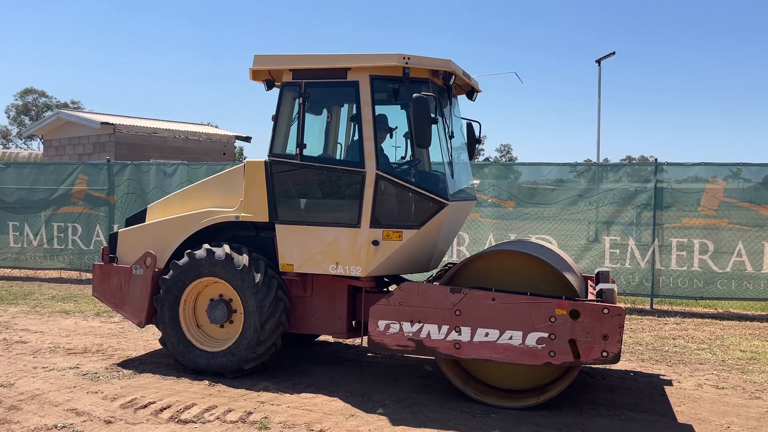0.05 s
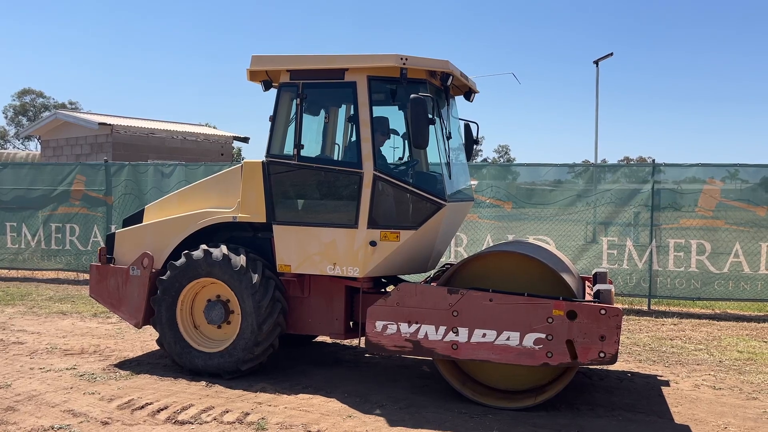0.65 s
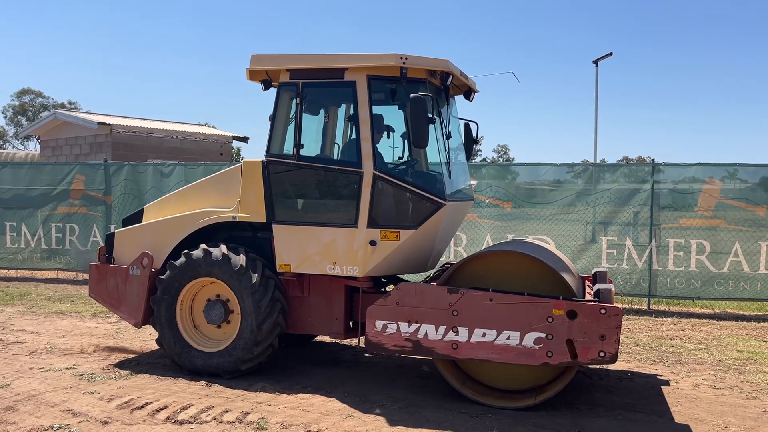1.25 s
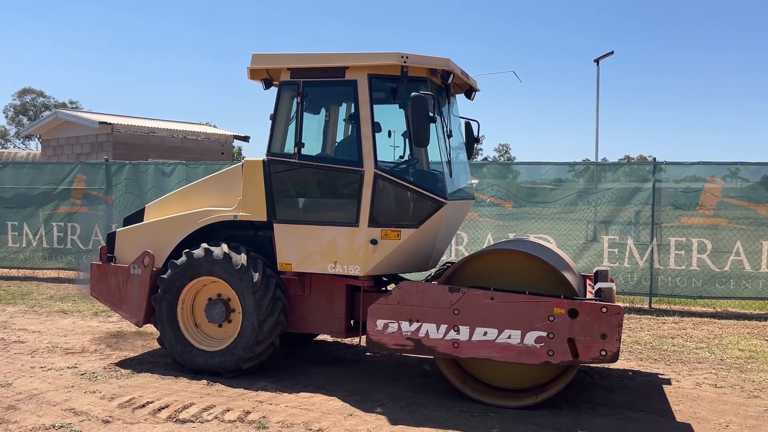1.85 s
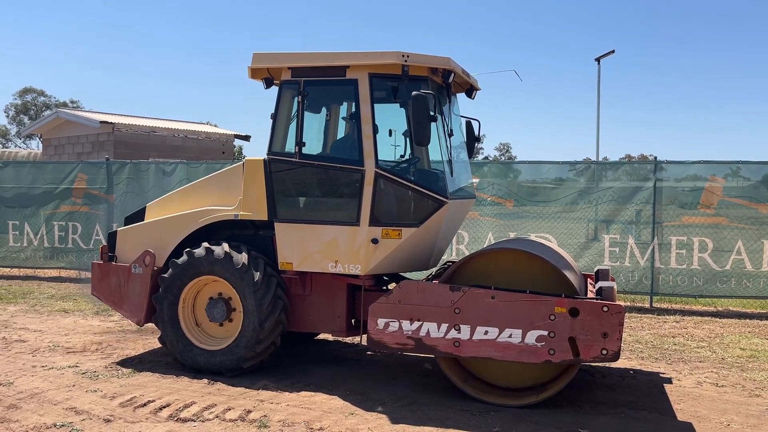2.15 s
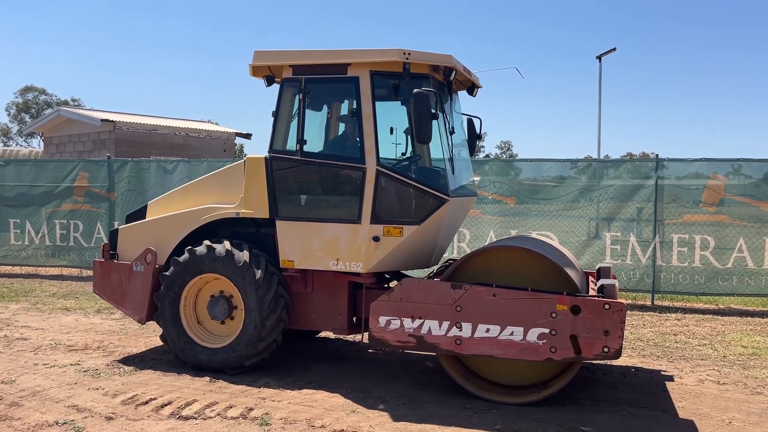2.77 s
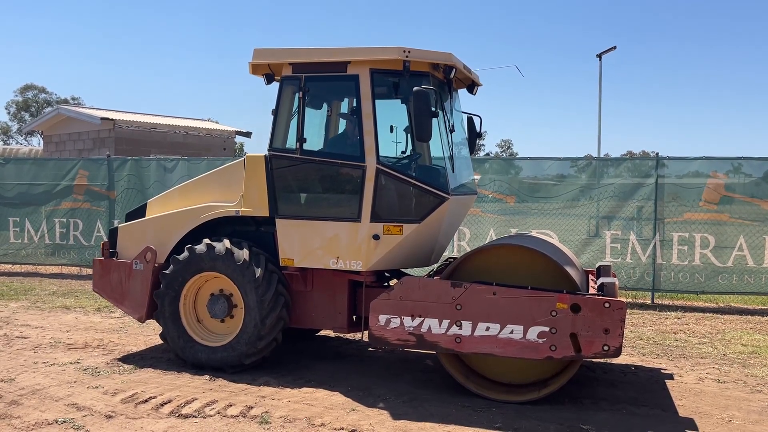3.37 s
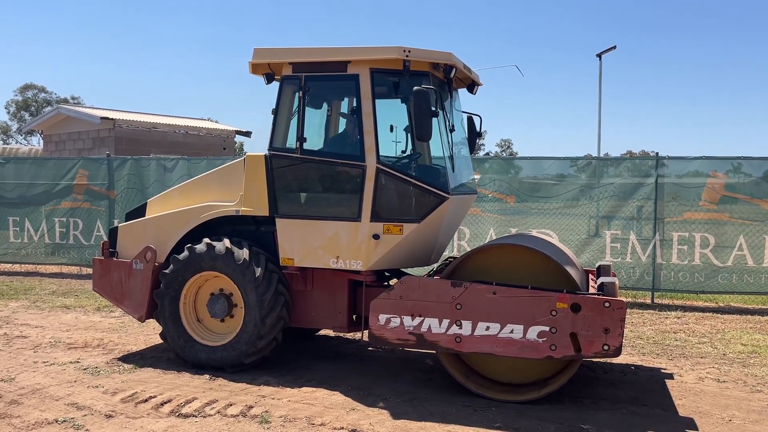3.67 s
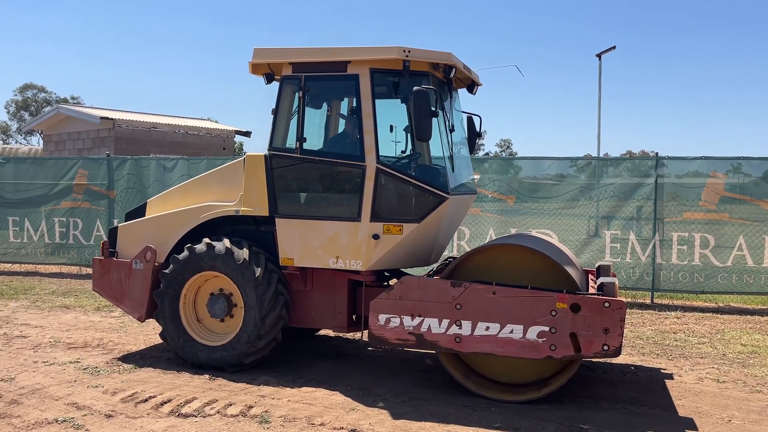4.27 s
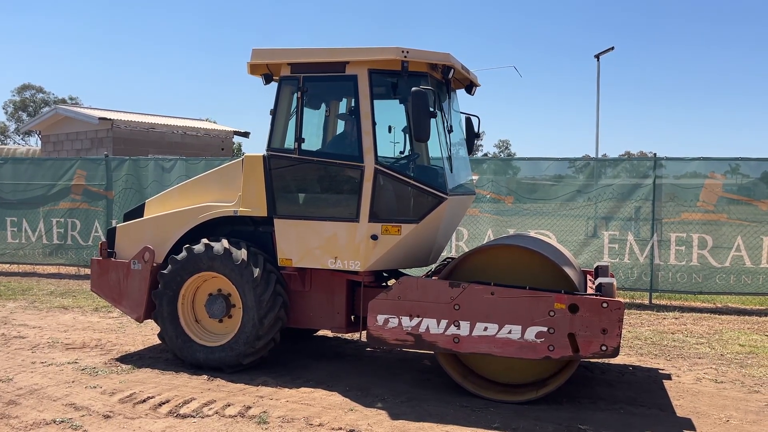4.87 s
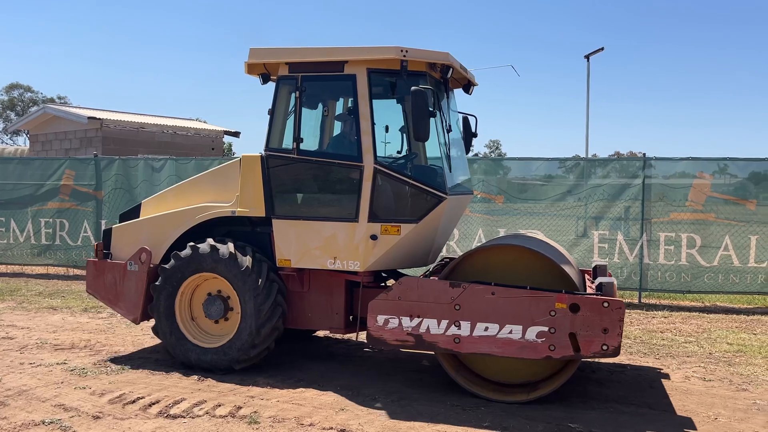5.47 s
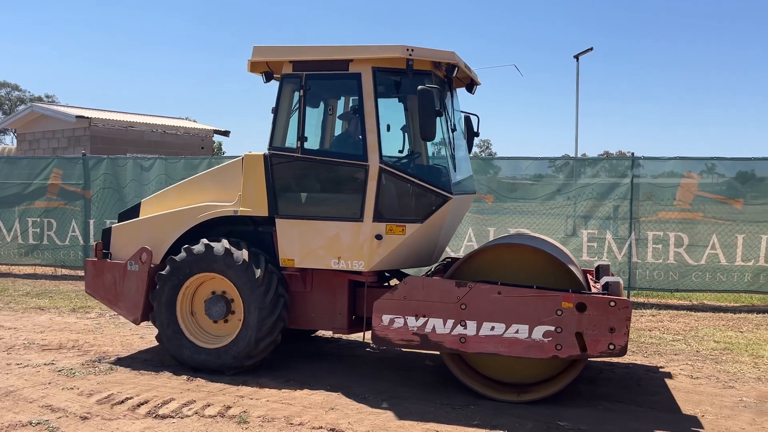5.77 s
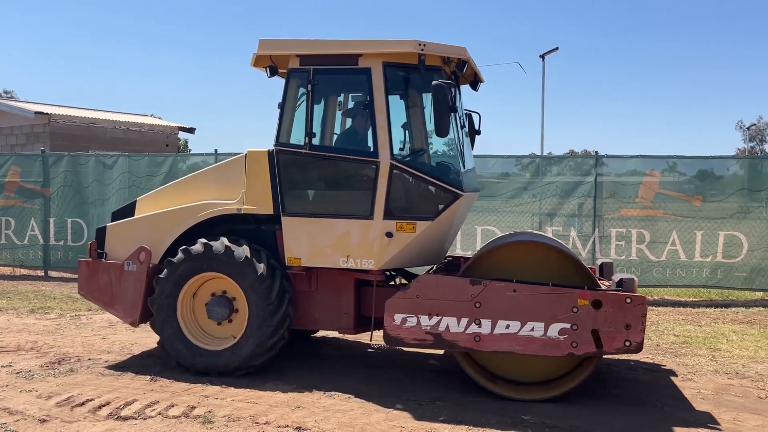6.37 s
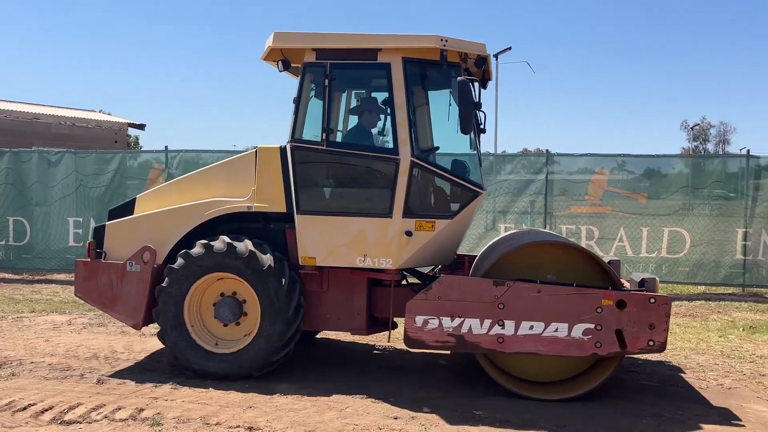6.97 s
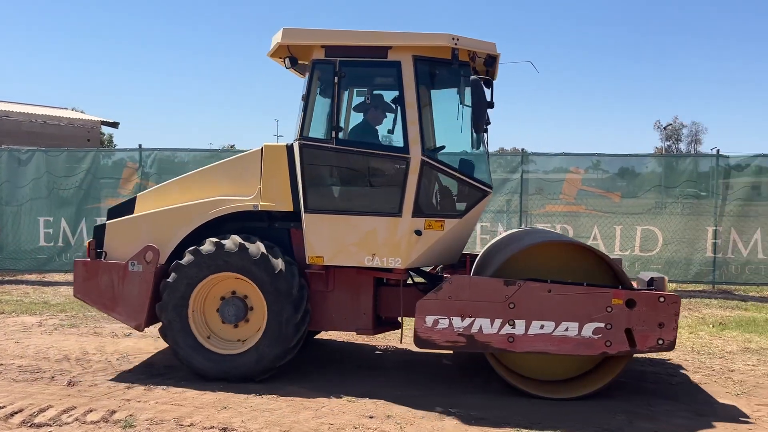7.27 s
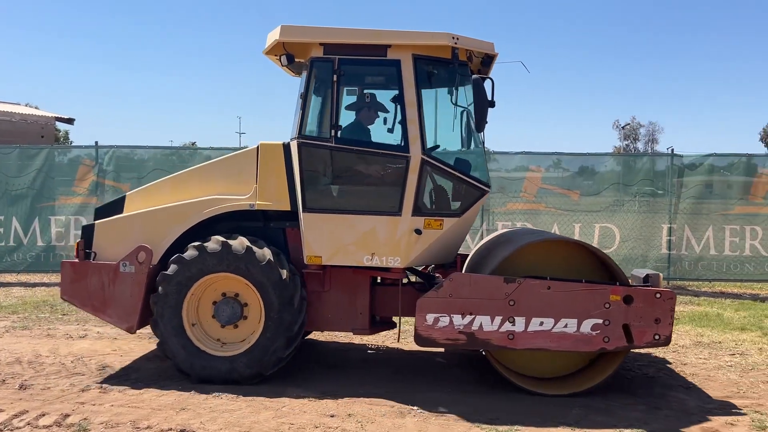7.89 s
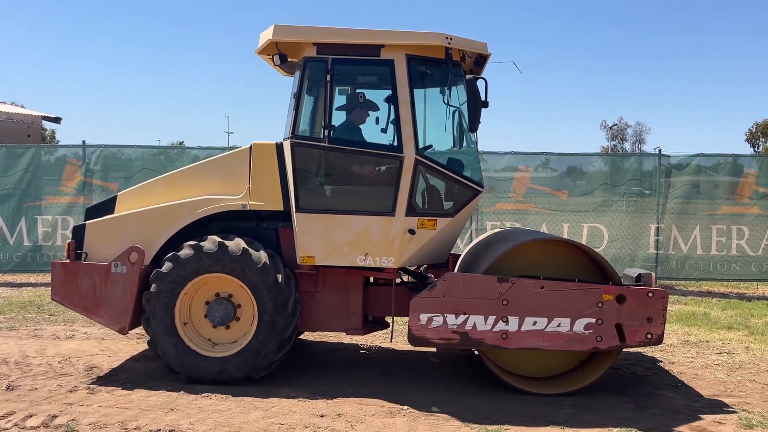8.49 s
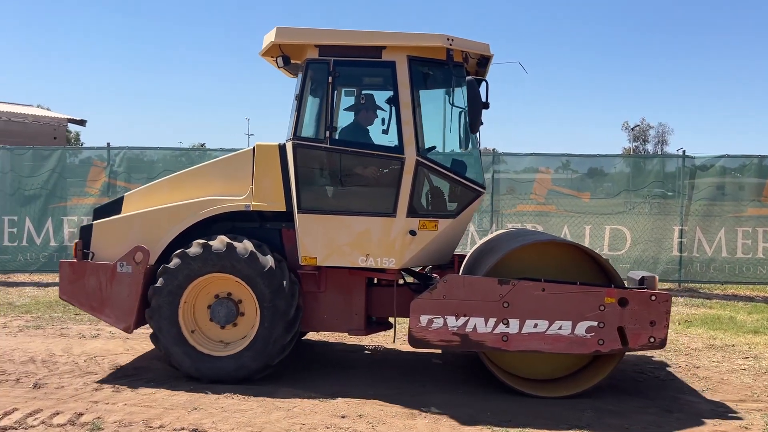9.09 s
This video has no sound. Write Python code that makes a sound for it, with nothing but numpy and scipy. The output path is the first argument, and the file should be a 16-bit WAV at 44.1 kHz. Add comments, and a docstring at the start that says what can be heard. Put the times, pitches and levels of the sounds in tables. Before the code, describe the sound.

At about 0.2 seconds a road roller's starter engages with a metallic clank, then whines, grinds and chugs for half a second. Around 0.7 seconds the diesel engine catches with deep kicks and hard knocks, surging near 1 second as the starter spins down. By 1.3 seconds it settles into a steady idle: a low exhaust drone with rapid metallic clatter, bright ticking and a hum of gears and fan. Gusts thump on the nearby stereo microphones, mostly from 2 to 3.4 seconds and again around 5. A light hydraulic whine rises from about 5 seconds, peaks before 7 and then recedes. Two soft footsteps scuff the dirt at about 6.3 and 7.1 seconds as the listener moves sideways. The idle then sounds slightly louder and boomier, with more fan hum, and continues until the end, just past 9 seconds. The place is an open dirt lot.

```python
"""Road roller starting up

Open dirt lot, spaced stereo microphones near the machine. The starter clanks in and cranks; the
four-cylinder diesel catches and settles to idle. Exhaust puffs drone, blows ring the block, the gears
and fan hum, a hydraulic pump whines. Gusts buffet the microphones, and about six seconds in the
listener takes a few steps sideways over the dirt."""
import sys
import numpy as np
from scipy import signal
from scipy.fft import rfft, irfft, next_fast_len
from scipy.io import wavfile
from scipy.ndimage import uniform_filter1d

SR = 44100
rng = np.random.default_rng(int(sys.argv[2]) if len(sys.argv) > 2 else 0)


def inscribe(sig):
    """Save sig as 16-bit PCM at rate SR to the path in sys.argv[1].

    A 1-D sig is mono; a 2-D sig holds one channel per row.
    Samples are clipped to [-1, 1] before scaling.
    """
    pcm = np.round(np.clip(np.atleast_2d(sig).T, -1, 1) * 32767)
    wavfile.write(sys.argv[1], SR, pcm.astype(np.int16))


N = 407484
T = np.arange(N) / SR
MESH_S, FIRST_FIRINGS_S, SURGE_S = .25, (.6, .76), .95  # pinion in, engine fires, fuel peaks
WALK_S, ARRIVE_S = (5.82, 6.8), (7.0, 7.2)  # the listener moves sideways, then comes to rest


def from_db(db):
    """Decibels to gain."""
    return np.exp(np.asarray(db) * (np.log(10) / 20))


def rms_one(x):
    """Scale to unit power."""
    return x / np.sqrt(np.mean(x ** 2) + 1e-20)


def in_time(points):
    """Read a curve at every sample."""
    return np.interp(T, *np.transpose(points))


def at_hz(points, hz):
    """Read a spectrum on a log-frequency axis."""
    f, value = np.transpose(points)
    return np.interp(np.log(np.maximum(hz, 1)), np.log(f), value)


def drift(rate):
    """A random curve of rms 1 that turns about rate times a second."""
    knots = rng.standard_normal(4096)
    return rms_one(np.interp(T * rate, np.arange(len(knots)), knots))


def ramp(start, end):
    """Rises from 0 to 1 between two moments."""
    return np.clip((T - start) / (end - start), 0, 1)


def bell(centre_s, width_s):
    """A Gaussian rise to 1 and back."""
    return np.exp(-((T - centre_s) / width_s) ** 2)


def strikes(rows, attack_s, decay_s):
    """A quick rise and a dying tail for each row of t/s, level/dB."""
    return sum(from_db(db) * ramp(s, s + attack_s) * np.exp(-np.maximum(T - s, 0) / decay_s)
               for s, db in rows)


def swells(rows):
    """A smooth rise and fall for each row of t/s, level/dB, length/s."""
    return sum(from_db(db) / (1 + ((T - s) / length) ** 2) ** 2 for s, db, length in rows)


def tone(turns, flutter_db, flutter_hz):
    """A sine of rms near 1 whose strength flutters."""
    return np.sqrt(2) * np.cos(2 * np.pi * turns) * from_db(flutter_db * drift(flutter_hz))


def white():
    """Two independent white noises."""
    return rng.standard_normal((2, N))


# Diffuse sound against direct at the microphones: f/Hz, level/dB
DIFFUSE_SHARE = [(60, -19), (150, -14), (300, -14), (800, -8), (2000, -12.5), (4000, -5), (8000, -18),
                 (15000, -36)]
# Left microphone against right: f/Hz, level/dB
BALANCE = [(60, 0), (110, 2), (200, -3.5), (380, 1.5), (700, -0.5), (1290, 4.5), (2380, -0.5), (4400, 4.5),
           (8120, -1.5), (15000, -1.5)]
# Lead of the left microphone: f/Hz, phase/rad
PHASE_LEAD = [(200, 0), (860, .4), (1810, -.1), (3270, 1.1), (4910, .4), (5510, -.6), (6550, -3.1),
              (7400, -5.6), (10200, -6.7), (12200, -9.4), (14000, -9.8), (14800, -12.4)]
def colour(pair, spectrum):
    """A direct and a diffuse signal, filtered and picked up by the spaced microphones; rms 1."""
    size = next_fast_len(N + 8192, real=True)
    hz = np.arange(size // 2 + 1) * SR / size
    direct, diffuse = rfft(pair, size) * from_db(at_hz(spectrum, hz)) * (hz > 15)
    diffuse = diffuse * from_db(at_hz(DIFFUSE_SHARE, hz))
    leftward = from_db(at_hz(BALANCE, hz) / 2) * np.exp(.5j * at_hz(PHASE_LEAD, hz))
    left, right = (direct + diffuse) * leftward, (direct - diffuse) / leftward
    return rms_one(irfft(np.array([left, right]), size)[:, :N])


def noise(spectrum):
    """Steady coloured stereo noise."""
    return colour(white(), spectrum)


def rough_noise(spectrum, flutter_db, flutter_hz):
    """Coloured stereo noise made grainy by a fast flutter."""
    return colour(white() * from_db(flutter_db * drift(flutter_hz)), spectrum)


# Background of the open lot: f/Hz, relative level/dB
AIR = [(18, -46), (30, -18), (64, 1), (138, -9), (239, -14.5), (359, -21), (513, -26), (552, -30.5),
       (2790, -45), (9000, -63), (11700, -94), (19800, -120)]
def open_air():
    """A faint, steady rumble lies over the lot."""
    return from_db(-38) * noise(AIR)


# Solenoid pulling in, pinion striking, pinion slamming home: t/s, level/dB
CLANKS = [(.208, -40), (.223, -30), (.236, -21.5)]
# Pinion on the ring gear: f/Hz, relative level/dB
PINION = [(120, -24), (200, -5), (400, -16), (500, 1), (600, -11), (780, -0.5), (1000, -10), (1330, -13),
          (1600, -7), (2100, -4.5), (2700, -16), (5000, -22), (8100, -28.5), (12700, -35), (15000, -37)]
# Ring of the flywheel housing: f/Hz, relative level/dB
HOUSING = [(120, -14), (220, 0), (400, -10), (520, 0), (780, 0), (1050, -8), (2100, -10), (3000, -26),
           (8000, -50)]
def starter_clank():
    """The solenoid throws the pinion into the ring gear, and the flywheel housing rings on."""
    impact = strikes(CLANKS, attack_s=.009, decay_s=.021) * rough_noise(PINION, .43, 650)
    housing = strikes(CLANKS, attack_s=.009, decay_s=.055) * noise(HOUSING)
    return impact + from_db(-10) * housing


# Commutator rate, held back by each compression, then coasting: t/s, f/Hz
COMMUTATOR = [(.2, 40), (.29, 91), (.345, 112), (.405, 115), (.44, 133), (.48, 145), (.535, 143),
              (.59, 164), (.64, 168), (.68, 186), (.77, 199), (.85, 181), (.97, 164), (1.3, 110)]
# Compressions that load the starter: t/s, level/dB
COMPRESSIONS = [(.399, -36), (.512, -30.5), (.534, -41), (.636, -39), (.699, -33), (.72, -36), (.741, -32),
                (.765, -35)]
# Chug of one compression: f/Hz, relative level/dB
CHUG = [(60, -12), (120, -4), (280, 6), (400, -6), (550, -3), (830, 3), (1400, -7), (2100, -4.5),
        (3100, -11), (4400, -14), (6000, -25), (11000, -27), (15000, -38)]
# Grinding of the starter gears: f/Hz, relative level/dB
GRIND = [(60, -25), (100, -2), (280, 2), (380, -9), (520, 0), (830, -1.5), (1400, -10), (2200, -10.5),
         (2750, -12), (3100, -4.5), (3400, -12.5), (4350, -16.5), (5800, -24.5), (11000, -28.5),
         (15000, -35)]
# Whine of their teeth: multiple of the commutator rate, relative level/dB
WHINE_ORDERS = [(22, 0), (31, -9)]
def starter():
    """The motor whines, grinds and chugs through the compressions, then is overrun and spins down."""
    release_s, rise_db_per_s, coast_db_per_s = .86, 24.5, 50
    turns = np.cumsum(in_time(COMMUTATOR)) / SR
    chugs = strikes(COMPRESSIONS, attack_s=.006, decay_s=.033) * rough_noise(CHUG, 2, 300)
    roughness_db = 1.1 * np.cos(2 * np.pi * turns) + 1.6 * drift(300)
    grind = colour(white() * from_db(roughness_db), GRIND)
    grind *= from_db(-46 + rise_db_per_s * (np.minimum(T, release_s) - MESH_S))
    whine = sum(from_db(db) * tone(k * turns + .22 * drift(300), 3, 90) for k, db in WHINE_ORDERS)
    whine *= from_db(-49.3) * (1 - .7 * ramp(.44, .56))  # sinks into the grinding
    hum_db = -47.5 + 15.5 * ramp(*FIRST_FIRINGS_S) - coast_db_per_s * np.maximum(T - release_s, 0)
    hum = from_db(hum_db) * tone(turns, flutter_db=1.5, flutter_hz=30)
    meshed = ramp(MESH_S, MESH_S + .03)
    driving = 1 - ramp(FIRST_FIRINGS_S[1], SURGE_S)
    return chugs + meshed * (hum + driving * (grind + whine))


# Governed firing rate, sagging under pump load: t/s, f/Hz
IDLE = [(1.7, 49.1), (4.2, 49.25), (5.3, 49.2), (5.9, 48.8), (6.4, 48.15), (6.85, 47.9), (7.1, 49.0),
        (7.4, 49.65), (7.8, 49.6), (8.3, 49.2), (9.24, 48.7)]
def firing_rate():
    """Firings per second: cranked slowly, then running up an S-curve to the governed speed."""
    cranking_hz, catch_s, run_up_s = 7, .85, .1
    caught = .5 + .5 * np.tanh((T - catch_s) / (2 * run_up_s))
    rate = cranking_hz * ramp(.18, MESH_S) * (1 - caught) + in_time(IDLE) * caught
    return rate * (1 + .0012 * drift(9))


def octaves(rate):
    """Doublings of speed relative to idle."""
    return np.log2(np.maximum(rate, 1) / np.median(rate))


def fuel_surge():
    """The governor's extra fuel during the run-up, 0 to 1."""
    return bell(SURGE_S, width_s=.12)


def cylinder_db(firings):
    """The four cylinders are not equally strong, so the engine chugs once per cycle."""
    return np.interp(firings % 4, np.arange(4), (-1, -.4, .4, 1), period=4)


# Exhaust orders: multiple of the firing rate, relative level/dB
EXHAUST_ORDERS = [(1, -0.5), (2, -4), (2.5, -19.5), (3, -10.5), (3.5, -15.5), (4, -17), (4.5, -15),
                  (5, -17.5)]
# Response of the silencer: f/Hz, gain/dB
SILENCER = [(15, -50), (28, -91), (42, -5.5), (52, 0), (72, -0.5), (98, -7), (150, -10.5), (260, -12.5)]
def exhaust(firings, rate):
    """One puff per firing, stronger with more fuel; the silencer favours the order in its boom."""
    arrived = ramp(*ARRIVE_S)
    boom_db = 1 + 2.5 * arrived  # the second order booms more where the listener stops
    timing = firings + .005 * drift(25)
    puffs = 0
    for order, db in EXHAUST_ORDERS:
        gain = from_db(db + at_hz(SILENCER, order * rate) + (order == 2) * boom_db)
        phase = (order > 2) * rng.random()
        puffs -= gain * tone(order * timing + phase, flutter_db=.5, flutter_hz=14)
    waver_db = (.9 * drift(7) + .5 * drift(49)) * (1 - .5 * arrived)
    level_db = -19.4 + 9.5 * fuel_surge() + 2.5 * arrived + waver_db + .4 * cylinder_db(firings)
    return from_db(level_db) * ramp(*FIRST_FIRINGS_S) * puffs


# Combustion, piston slap, valves, injection, gear teeth:
# blows per engine cycle, offset/cycles, relative level/dB, decay/s, unevenness/dB
CONTACTS = [(4, .006, -1.5, .008, 1), (2, .1, -4, .008, 1), (10, .02, -2, .004, 2.5),
            (13, .02, -6, .005, 2), (23, .01, -6, .0036, 0)]
def blows(firings, rate):
    """Metal contacts recur every four firings; their ring partly repeats, partly is new each blow."""
    size, harmonics, idle_hz = 16384, 1300, IDLE[0][1]
    cycle, cycle_s = np.arange(size) / size, 4 / idle_hz
    power = 0
    for count, offset, db, decay_s, uneven_db in CONTACTS:
        for k, extra_db in enumerate(uneven_db * rng.permutation(np.linspace(-1, 1, count))):
            age_s = (cycle - offset - k / count) % 1 * cycle_s
            power += (from_db(db + extra_db) * np.exp(-age_s / decay_s)) ** 2
    position = (firings / 4 % 1 * size).astype(int)
    phases = np.exp(2j * np.pi * rng.random((2, 2, harmonics)))
    before, after = rms_one(irfft(phases, size))[..., position]
    walked = ramp(*WALK_S)  # the paths to the microphones change during the walk
    repeating = np.cos(walked * np.pi / 2) * before + np.sin(walked * np.pi / 2) * after
    ring = repeating + .8 * white()
    sharpness = np.minimum(rate / idle_hz, 1) * (1 - .2 * walked)
    envelope = rms_one(np.sqrt(power))[position] ** sharpness
    return rms_one(ring * envelope * from_db(cylinder_db(firings) + .8 * drift(120)))


# Resonances of covers and panels: f/Hz, bandwidth/Hz, gain/dB
PANELS = [(1860, 11, -10), (2280, 100, -10), (2690, 130, -7), (2754, 100, -3.5), (3020, 75, 2),
          (3580, 126, 0), (4340, 110, -6.5), (4860, 40, 2), (5110, 53, 1)]
# Echoes off the ground, the drum frame and the fence: delay/s, gain/dB
ECHOES = [(.0043, -36), (0.0133, -14), (0.0317, -7)]
def ring_and_echo(hits):
    """Panels ring after each blow, and nearby surfaces throw the sound back."""
    ringing = hits.copy()
    for hz, width_hz, db in PANELS:
        radius = np.exp(-np.pi * width_hz / SR)
        numerator = np.array([1, 0, -1]) * (1 - radius ** 2) / 2
        denominator = [1, -2 * radius * np.cos(2 * np.pi * hz / SR), radius ** 2]
        ringing += from_db(db) * signal.lfilter(numerator, denominator, hits)
    echoes = sum(from_db(db) * np.pad(ringing, ((0, 0), (int(delay_s * SR), 0)))[:, :N]
                 for delay_s, db in ECHOES)
    return rms_one(ringing + echoes)


# Engine block from the first position: f/Hz, relative level/dB
BLOCK = [(90, -1), (150, -26), (250, -2.5), (350, -8.5), (480, -6.5), (570, -8), (700, -5.5), (860, -5.5),
         (1150, -10.5), (1480, -7.5), (1620, -14), (2300, -15), (2700, -18), (3800, -26), (5100, -32),
         (6500, -65), (12000, -120)]
# The block from a few steps to the side: f/Hz, relative level/dB
BLOCK_SIDE = [(90, -2.5), (150, -11), (280, -8.5), (380, -9), (520, -9), (680, -7), (800, -8), (1050, -10),
              (1430, -10.5), (1640, -17.5), (1950, -15), (2800, -23), (3800, -30), (5100, -36.5),
              (6500, -63), (12000, -120)]
# Bright ticking of the blows: f/Hz, relative level/dB
TICKING = [(3000, -18), (4800, -2.5), (6000, 2.5), (7200, 4), (8500, 0), (11000, -5.5), (12300, -5.5),
           (15000, -12), (16000, -27)]
def knocking(firings, rate):
    """Block and panels radiate the blows over rushing cooling air; the walk reveals other faces."""
    walked = ramp(*WALK_S)
    hits = ring_and_echo(blows(firings, rate) + .37 * white())
    body = from_db(3.5) * (1 - walked) * colour(hits, BLOCK)
    body += from_db(5) * walked * colour(hits, BLOCK_SIDE)
    body *= from_db(1.8 * bell(1.13, width_s=.15))  # the cold engine clatters most on reaching speed
    ticks = from_db(-17.5) * colour(hits + 1.12 * white(), TICKING)
    return from_db(-31.5 + 8.5 * octaves(rate)) * ramp(*FIRST_FIRINGS_S) * (body + ticks)


# First cylinders to fire: t/s, level/dB
KICKS = [(.716, -17), (.766, -10), (.809, -14.5)]
def silencer_kicks(ring_hz=56):
    """Each of the first firings leaves a short, deep ring in the silencer."""
    return sum(strikes([(s, db)], attack_s=.003, decay_s=.024) * np.sin(2 * np.pi * ring_hz * (T - s))
               for s, db in KICKS)


# Hard combustion knocks: t/s, level/dB
COLD_KNOCKS = [(.757, -32), (.797, -32), (.842, -34), (.878, -28), (.952, -26), (1.03, -28), (1.082, -28)]
# Their ring: f/Hz, relative level/dB
COLD_RING = [(200, -14), (500, -4), (900, -2), (1350, 1), (1700, -5), (2200, -3), (2900, -16), (5000, -27),
             (12000, -50)]
def cold_knocks():
    """The cold engine knocks hard as it catches under full fuel."""
    return strikes(COLD_KNOCKS, attack_s=.004, decay_s=.02) * noise(COLD_RING)


# Gas leaving the exhaust: f/Hz, relative level/dB
BLAST = [(60, -14), (115, 0), (180, -5), (265, 1), (380, -14), (520, -12), (800, -14), (1500, -35),
         (5000, -90)]
def exhaust_blast(firings):
    """Under full fuel each firing throws out a rough puff of gas."""
    puffs = rms_one(.6 + np.sin(np.pi * np.sqrt(firings % 1)) ** 2)
    return from_db(-26) * fuel_surge() * ramp(*FIRST_FIRINGS_S) * puffs * noise(BLAST)


def clutch(pitch_hz=1305):
    """The starter's overrunning clutch sings briefly as the engine outruns it."""
    envelope = ramp(.8, .86) * (1 - ramp(.99, 1.13))
    return from_db(-36.5) * envelope * tone(pitch_hz * T + .2 * drift(110), flutter_db=3, flutter_hz=50)


def timing_howl(firings):
    """The timing gears howl upwards under the load of the run-up."""
    return from_db(-35) * bell(1.01, width_s=.11) * tone(7.75 * firings, flutter_db=2, flutter_hz=30)


# Gear train and block tones: multiple of the firing rate, relative level/dB before and after the walk
GEAR_ORDERS = [(5.5, -54, -48), (6.75, -56, -49), (7.75, -52, -45), (9.75, -48, -58), (10, -41, -47),
               (10.5, -48, -46), (11.25, -58, -50), (12.5, -42, -45), (13.75, -49, -54), (15, -49, -56),
               (17, -49, -50), (17.5, -50, -49), (18.25, -58, -49), (19.5, -48, -56), (22, -52, -52),
               (22.5, -48, -57), (23, -51, -54), (23.75, -49, -57), (25, -49, -55), (27, -50, -57),
               (27.5, -47, -58), (29.25, -46.5, -56), (30, -43.5, -53), (30.75, -50, -58), (32, -52, -64),
               (34, -51, -64), (35, -52, -62), (36, -48.5, -59), (38.25, -53, -55), (40.5, -55, -64),
               (46.25, -57, -59), (53, -55, -64)]
def gears(firings):
    """Teeth mesh in step with the crank; the mix of their tones shifts as the microphones move."""
    walked, tones = ramp(*WALK_S), 0
    for order, before_db, after_db in GEAR_ORDERS:
        turns = order * firings + rng.random() + .2 * drift(1.5)
        gain = from_db(before_db + (after_db - before_db) * walked)
        tones += gain * tone(turns, flutter_db=1.6, flutter_hz=11)
    return from_db(-1) * ramp(*FIRST_FIRINGS_S) * tones


# Fan hum with the engine at idle speed: t/s, level/dB
FAN_LEVEL = [(1.05, -44), (1.22, -37.7), (5.3, -38), (6.5, -44), (7.0, -41), (7.4, -33.5), (8.7, -33.5),
             (8.9, -42)]
def fan(firings):
    """The belt-driven fan hums at its own ratio to the crank."""
    turns = 6.325 * firings + .013 * drift(6.7)
    return from_db(in_time(FAN_LEVEL)) * np.sqrt(2) * np.cos(2 * np.pi * turns)


# Pump whine, following its load: t/s, relative level/dB
PUMP_LEVEL = [(.85, -48), (1.05, -38), (1.25, -35), (1.42, -38), (1.6, -48), (4.85, -48), (5.2, -35),
              (5.7, -34), (6.15, -29), (6.88, -28.5), (7.05, -36), (7.14, -44), (7.23, -34.5), (7.45, -32),
              (7.7, -40.5), (9.24, -39)]
# Piston tones: multiple of the firing rate, relative level/dB
PISTON_ORDERS = [(9, -21), (18, 0), (27, -14)]
def hydraulic_pump(firings):
    """The pump turns with the crank, and its pistons whine."""
    shaft = firings + .0025 * drift(40) + .012 * drift(3)
    whine = sum(from_db(db) * tone(k * shaft, flutter_db=1, flutter_hz=35) for k, db in PISTON_ORDERS)
    return from_db(in_time(PUMP_LEVEL)) * whine


# Breeze on the microphones: t/s, relative level/dB
BREEZE = [(1.1, -20), (1.39, -30.5), (2.23, -18.5), (2.85, -23), (2.87, -17), (3.32, -28.5), (3.37, -18),
          (3.48, -24.5), (4.52, -27.5), (5.09, -22), (5.77, -36), (6.68, -23), (7.06, -37), (7.18, -25),
          (7.38, -31), (8.42, -37), (8.67, -27), (9.24, -30)]
# Its rumble: f/Hz, relative level/dB
RUMBLE = [(20, -30), (40, -13), (60, 2), (85, -0.5), (120, -14), (180, -21), (300, -29), (600, -67),
          (5000, -130)]
# Gusts striking the microphones: t/s, relative level/dB, length/s
GUSTS = [(1.14, -26, .02), (1.22, -24, .025), (1.57, -29, .02), (1.74, -27, .03), (1.94, -24, .03),
         (2.2, -19, .035), (2.305, -20, .035), (2.39, -17.5, .035), (2.455, -17, .03), (2.52, -22, .035),
         (2.78, -19, .035), (2.885, -17, .04), (3.025, -18, .045), (3.14, -27, .02), (3.35, -20, .04),
         (4.85, -26, .035), (5.01, -20, .04), (5.08, -22, .03), (5.17, -24, .025), (5.25, -22, .025),
         (5.305, -22, .02), (6.5, -22, .02), (6.66, -26, .03), (7.26, -26, .025)]
# Their eddies: f/Hz, relative level/dB
EDDIES = [(40, -22), (66, 5.5), (115, 5), (165, 1.5), (230, -6.5), (320, -13), (500, -28), (1000, -60),
          (5000, -120)]
def wind():
    """Lumpy rumble right on the microphones; strong gusts thump and reach higher."""
    rumble = from_db(in_time(BREEZE) + .3) * ramp(1.0, 1.15) * noise(RUMBLE)
    eddies = noise(EDDIES)
    short_rms = np.sqrt(uniform_filter1d(np.mean(eddies ** 2, axis=0), size=1100) + 1e-6)
    return rumble + from_db(.5) * swells(GUSTS) * eddies / short_rms


# Shoes scuffing the dirt below the microphones: t/s, level/dB, length/s
STEPS = [(6.255, -30.5, 0.073), (7.13, -32, 0.087)]
def footsteps():
    """Grit crackles under each sole."""
    grit = [(400, 8), (1500, 17), (4000, 0), (9000, -4.5), (15000, -12)]  # f/Hz, relative level/dB
    return swells(STEPS) * rough_noise(grit, flutter_db=.98, flutter_hz=400)


def scene():
    """The roller on the open lot; the crank's speed drives the running engine's tones and blows."""
    rate = firing_rate()
    firings = np.cumsum(rate) / SR
    engine = exhaust(firings, rate) + silencer_kicks() + exhaust_blast(firings) + knocking(firings, rate)
    slightly_left = from_db([[.7], [-.7]])
    rotors = slightly_left * (gears(firings) + hydraulic_pump(firings)) + fan(firings)
    engine += from_db(12 * octaves(rate)) * rotors  # 12 dB louder per doubling of speed
    start = starter_clank() + starter() + cold_knocks() + clutch() + timing_howl(firings)
    return open_air() + start + engine + wind() + footsteps()


def record(dry):
    """The microphone signal opens abruptly, with a 33 Hz low cut and a 15.8 kHz high cut."""
    low_cut = signal.butter(4, 33, "high", fs=SR, output="sos")
    high_cut = signal.ellip(10, .1, 80, 15800, fs=SR, output="sos")
    return signal.sosfilt(high_cut, signal.sosfilt(low_cut, dry) * ramp(.033, .034))


dry = scene()
out = record(dry)
inscribe(out)
```